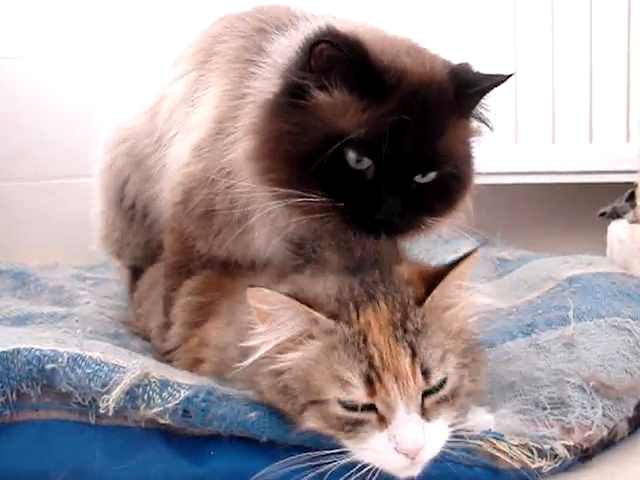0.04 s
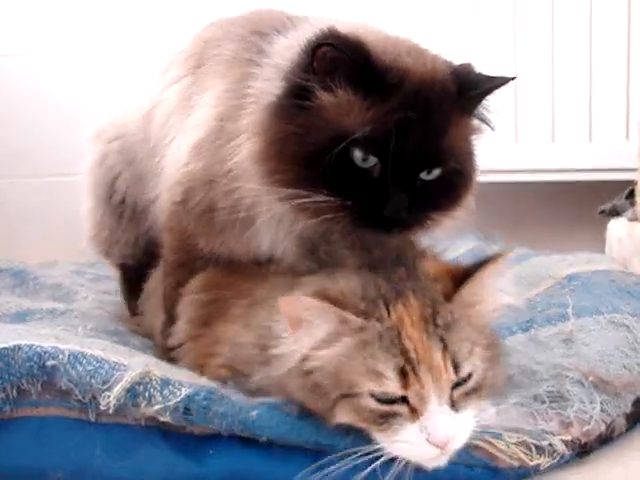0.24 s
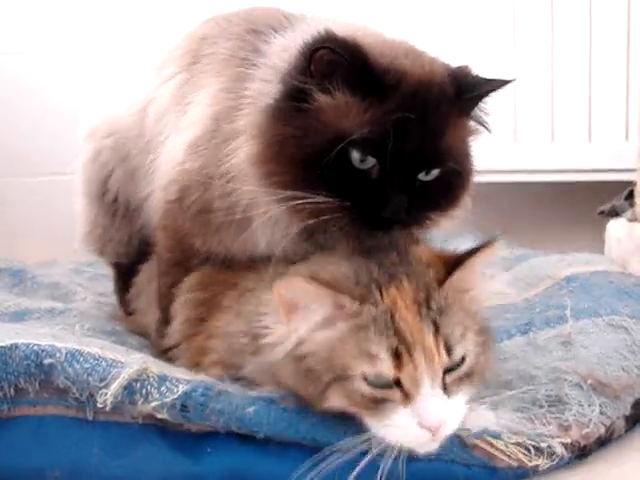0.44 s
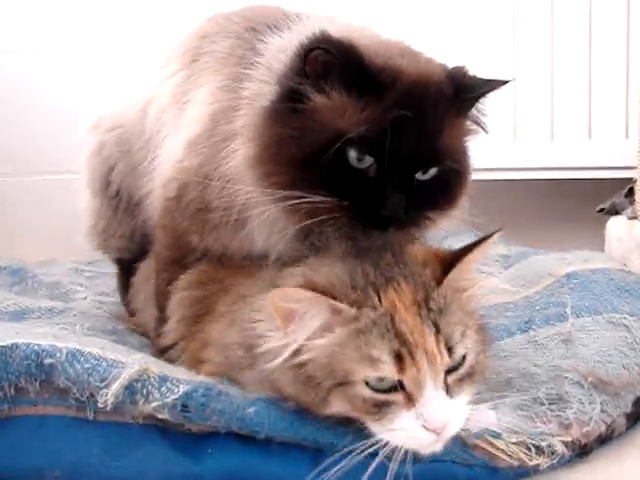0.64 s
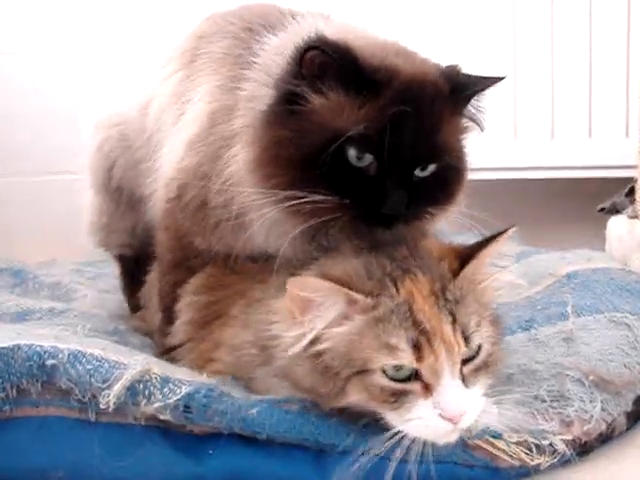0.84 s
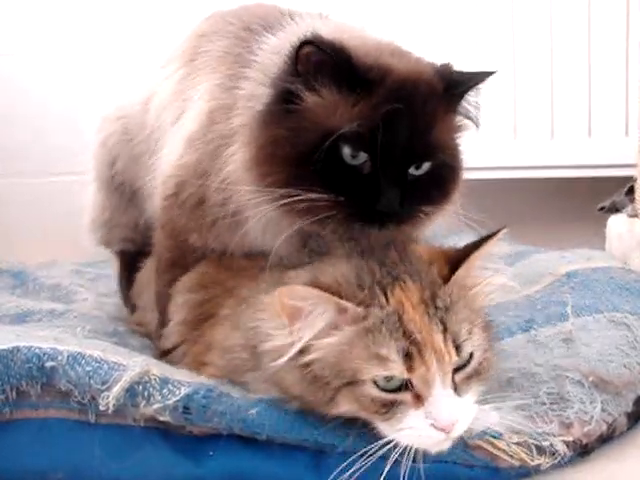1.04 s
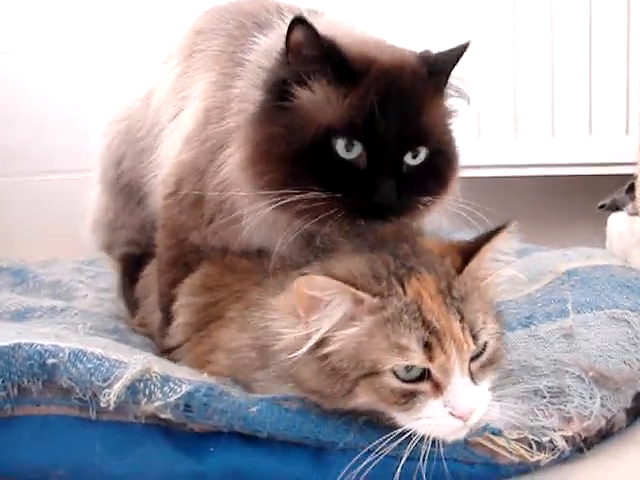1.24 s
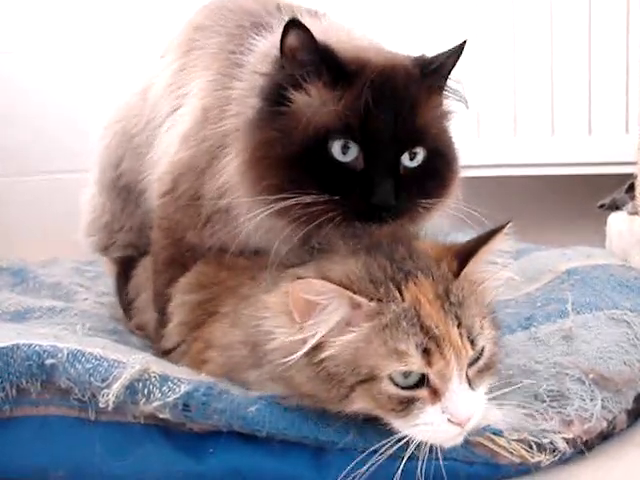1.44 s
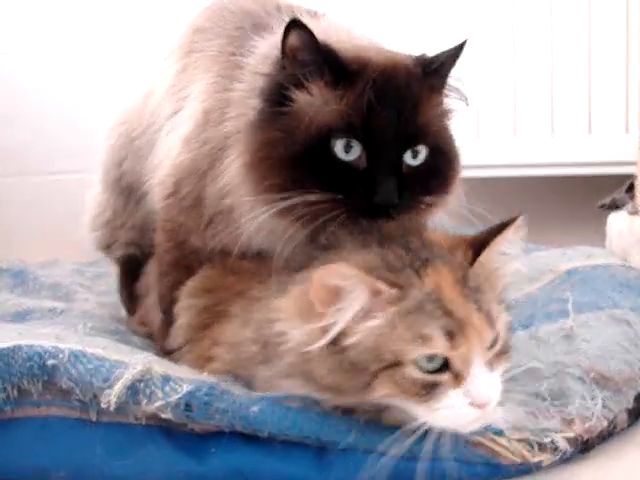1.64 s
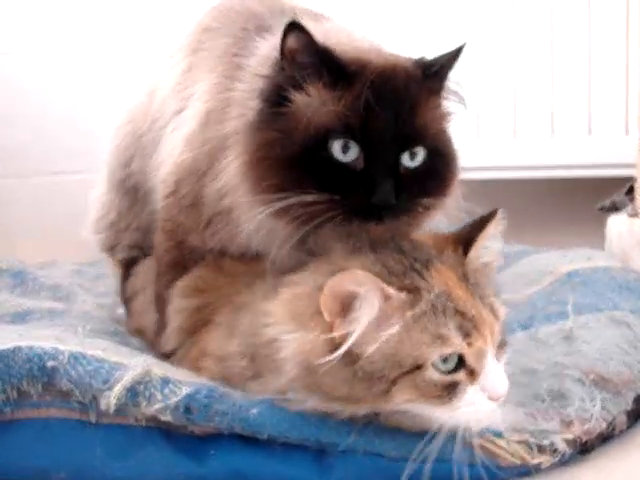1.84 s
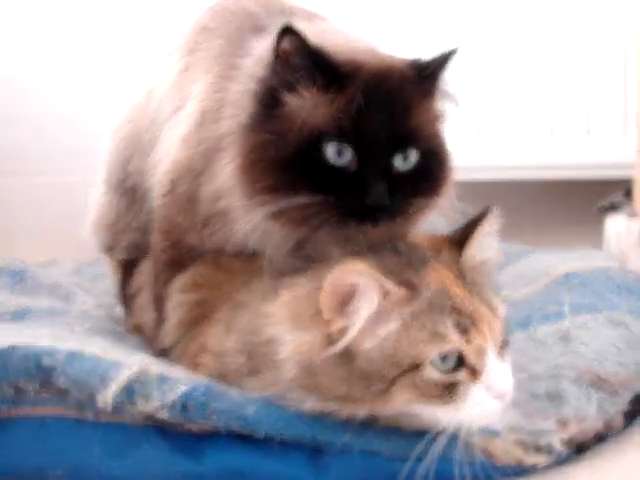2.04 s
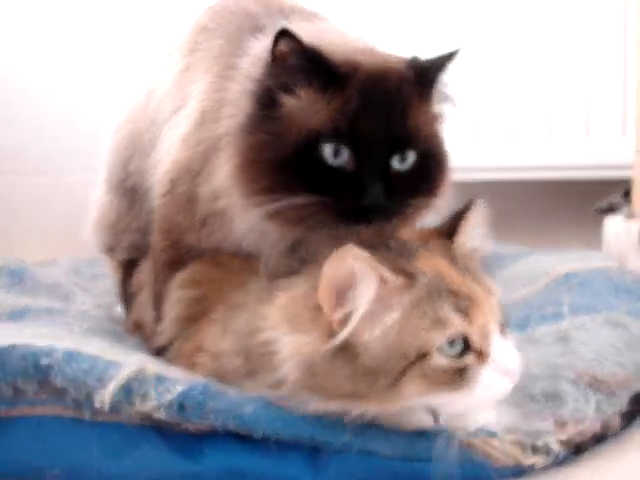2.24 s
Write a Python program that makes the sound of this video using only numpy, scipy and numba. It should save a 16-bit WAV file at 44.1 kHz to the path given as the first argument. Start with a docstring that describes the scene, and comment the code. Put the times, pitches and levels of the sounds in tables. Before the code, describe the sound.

A cat grunts three times, then gives one rough yowl that sinks into a low growl.

```python
"""A small hard room: a cat pinned under another gives three short grunts, then one long rough yowl.
The yowl rises with three hard pushes, sinks into a low growl as the mouth closes, and fades.
Uneven, fluttering vocal-fold pulses and puffs of turbulence ring mouth, chest and throat, along with
clear low harmonics. Two soft bumps and a faint rustle of bedding lie over a quiet background."""
import sys
import numpy as np
from scipy import signal
from scipy.fft import rfft, irfft
from scipy.io import wavfile
from scipy.ndimage import uniform_filter1d
from numba import njit

SR = 44100
rng = np.random.default_rng(int(sys.argv[2]) if len(sys.argv) > 2 else 0)


def persist_wave(psi):
    """Save psi, clipped to +-1, as 16-bit WAV."""
    counts = np.round(np.clip(psi, -1, 1) * 32767).astype(np.int16)
    wavfile.write(sys.argv[1], SR, np.atleast_2d(counts).T)


N = 101429
T = np.arange(N) / SR

# Each row: frequency in Hz, relative density in dB.
BACKGROUND_SPECTRUM = [(25, -14.5), (100, -6.5), (190, -4), (290, -0.5), (400, -8.5), (550, -10.5),
                       (800, -9), (1200, -16.5), (2500, -21.5), (6000, -24.5), (10000, -31)]
# Each row: start in seconds, time to release in seconds, level in dB, growl over tone in dB.
OPENING_GRUNTS = [(0.149, 0.021, -17, 2), (0.235, .037, -15, -1.5), (0.316, 0.032, -15.5, 0.5)]
# Each row: time in seconds, vocal-fold pitch in Hz.
FOLD_PITCH = [(.15, 275.4), (.26, 259.9), (.41, 254.7), (.56, 279.8), (.62, 264), (.69, 289.9),
              (.735, 318.9), (.82, 336.4), (.96, 323.9), (1.1, 298.1), (1.2, 313.1), (1.29, 265.9),
              (1.41, 243.9), (1.53, 220), (1.6, 173.9), (1.73, 166), (1.83, 146.6), (1.88, 184.6)]
# Each row: time in seconds, then mix levels in dB of harmonics 1, 2 and 3, flutter side tone,
# mouth growl, chest growl.
VOICE_MIX = [(.16, -11.5, -13.5, -14, -16, -1.5, -5.5), (.26, -5.5, -3, -12.5, -25, -4.5, -15),
             (.34, -7, -1, -24, -35.5, -8.5, -13.5), (.45, -8.5, -6, -22, -31, -10, -19.5),
             (.58, -10.5, -3.5, -30, -28, -3.5, -13), (.69, -9, -4.5, -11, -20.5, -4.5, -7),
             (.81, -14, -12, -20.5, -2.5, -0.5, -5.5), (.97, -4.5, -4.5, -13.5, -3, -7, -4),
             (1.06, -13.5, -19, -21.5, -4, -6, -2), (1.2, -10.5, -31, -21, -5.5, -5.5, -4),
             (1.3, -2.5, -3, -32, -25, -7.5, -8.5), (1.41, -3.5, -15.5, -38, -35, -7, -14),
             (1.5, -7.5, -26, -30.5, -31, -7, -4.5), (1.65, -1, -20, -24, -12, -9, -2.5),
             (1.82, -7.5, -10, -16, -10, -14, -6), (1.89, -2, -4, -25, -11, -10.5, -2.5)]
# Each row: time in seconds, lower resonance in Hz, upper resonance in Hz, upper over lower in dB.
MOUTH_FORMANTS = [(.16, 910, 1570, -6.5), (.27, 807, 1640, -10), (.42, 807, 1970, -13.5),
                  (.58, 716, 1920, -16), (.73, 628, 1600, -17.5), (.82, 588, 1580, -13.5),
                  (.92, 590, 1360, -8.5), (1.05, 540.1, 1345, -11.5), (1.25, 493, 1340, -12),
                  (1.42, 460, 1370, -23), (1.65, 377, 1590, -23), (1.9, 356, 1653, -7.5)]
# Each row: time in seconds, resonance in Hz.
CHEST_FORMANT = [(.95, 371.4), (1.65, 286)]
# Throat rasp. Each row: frequency in Hz, relative density in dB.
RASP_SPECTRUM = [(1500, -11), (2300, -33.5), (2550, 2), (2750, -7.5), (3050, -2.5), (3350, -4), (3650, -2),
                 (3880, -2), (4150, -6.5), (4500, -12.5), (5400, -13), (6200, -8.5), (6800, -12),
                 (8300, -14.5), (10000, -30)]
# Each row: time in seconds, mix level in dB.
RASP_MIX = [(.17, -18.5), (.27, -28), (.36, -30.5), (.45, -32), (.6, -25), (.75, -24.5), (.9, -22),
            (1.1, -26), (1.33, -32.5), (1.44, -32), (1.9, -35.5)]
# Narrow resonances of the room's corners. Each row: pitch in Hz, peak time in seconds, sigma in seconds, mix
# level in dB.
ROOM_RINGS = [(955, .17, 0.012, 2.5), (904, 0.418, 0.053, -7.5), (945, .74, 0.21, -10),
              (521, 1.195, .025, -4.5), (664, 1.26, 0.092, -7.5), (408, 1.289, 0.052, -3),
              (408, 1.518, 0.068, 0.5)]
# Each row: peak time in seconds, sigma in seconds, level in dB.
BEDDING_RUSTLES = [(0.222, 0.028, -38), (0.42, 0.13, -41), (1.617, 0.16, -50), (1.89, 0.009, -51.5),
                   (1.94, 0.039, -49.5), (2.201, 0.15, -49)]
# Each row: frequency in Hz, relative density in dB.
RUSTLE_SPECTRUM = [(200, -6), (800, 5.5), (1900, -1), (3000, -3), (6500, -10.5), (10000, -18.5)]
# Each row: time in seconds, level before the room in dB.
YOWL_EFFORT = [(.393, -53), (.41, -21), (.44, -18.5), (.7, -18.5), (.73, -10), (.76, -16), (.86, -14.5),
               (.885, -10), (.91, -13.5), (1.12, -16.5), (1.32, -13), (1.38, -18.5), (1.53, -20.5),
               (1.68, -28), (1.81, -32.5), (1.9, -28), (1.925, -38), (2.03, -51.5)]
# Each row: peak time in seconds, tone sigma in seconds, tone and snarl mix levels in dB.
HARD_PUSHES = [(.733, 0.012, 5, -19.5), (0.883, 0.014, 7, -18.5), (1.071, 0.052, -3.5, -25.5)]
# Each row: centre in Hz, width in Hz, relative level in dB.
SNARL_FORMANTS = [(2800, 620, -4.5), (3840, 450, -4.5)]
# Each row: peak time in seconds, sigma in seconds, pitch in Hz, level in dB.
SOFT_BUMPS = [(0.747, 0.00076, 62, -21.5), (1.613, 0.054, 68.84, -43.5)]


def undb(db):
    """Decibels to gain."""
    return 10 ** (np.asarray(db) / 20)


def curve(rows, column=1):
    """One table column, linear in time between rows."""
    rows = np.array(rows, float)
    return np.interp(T, rows[:, 0], rows[:, column])


def swell(peak_s, sigma_s):
    """Gaussian envelope."""
    return np.exp(-.5 * ((T - peak_s) / sigma_s) ** 2)


def sine(cycles):
    """Tone at rms 1."""
    return np.sqrt(2) * np.sin(2 * np.pi * cycles)


def steady(x, window_samples=3000):
    """Hold the running rms at 1."""
    return x / np.sqrt(uniform_filter1d(x * x, window_samples) + 1e-12)


def walk(cutoff_hz):
    """Smooth random drift, spread 1."""
    hz = np.fft.rfftfreq(N, 1 / SR)
    drift = irfft(rfft(rng.standard_normal(N)) / (1 + (hz / cutoff_hz) ** 4), N)
    return drift / np.std(drift)


def colour(x, spectrum):
    """Filter by a spectrum, scale to rms 1."""
    hz, db = np.array(spectrum, float).T
    bins_hz = np.fft.rfftfreq(N, 1 / SR)
    shaped = irfft(rfft(x) * undb(np.interp(np.log(bins_hz + 1), np.log(hz), db)), N)
    return shaped / np.std(shaped)


@njit
def bandpass(x, hz, width_hz):
    """State-variable band-pass, gain 1 at the centre."""
    y, band, low = np.empty(len(x)), 0., 0.
    for i in range(len(x)):
        g, damping = np.tan(np.pi * hz[i] / SR), width_hz[i] / hz[i]
        v = (band + g * (x[i] - low)) / (1 + g * (g + damping))
        band, low = 2 * v - band, low + 2 * g * v
        y[i] = damping * v
    return y


def formant(x, hz, width_hz, stages=4):
    """Movable resonance: cascaded band-passes, each width_hz wide, held at rms 1."""
    for _ in range(stages):
        x = bandpass(x, hz + np.zeros(N), width_hz + np.zeros(N))
    return steady(x, window_samples=1300)


def background(level_db=-47.5):
    """Quiet, steady low noise."""
    return undb(level_db) * colour(rng.standard_normal(N), BACKGROUND_SPECTRUM)


def grunts(attack_s=0.015, release_s=0.014):
    """Short bursts of effort: envelopes for tone and growl."""
    tone = growl = 0
    for start_s, length_s, db, hoarse_db in OPENING_GRUNTS:
        attack = np.clip((T - start_s) / attack_s, 0, 1)
        release = np.exp(-np.maximum(T - start_s - length_s, 0) / release_s)
        tone += undb(db - hoarse_db / 2) * attack * release
        growl += undb(db + hoarse_db / 2) * attack * release
    return tone, growl


def vocal_folds(cycles, flutter_cycles, shimmer_db=1, puff_decay_cycles=0.44):
    """One uneven pulse and one turbulent puff per cycle, both throbbing with a slower flutter."""
    phase = cycles + .06 * (walk(150) + 2 * walk(35))  # jitter
    count = np.maximum.accumulate(np.floor(phase))
    pulses = np.diff(count, prepend=count[0]) * undb(-shimmer_db * walk(290))
    puffs = rng.standard_normal(N) * np.exp(-(phase % 1) / puff_decay_cycles)
    flutter = np.exp(0.23 * np.sin(2 * np.pi * flutter_cycles))
    return steady(pulses) * flutter, steady(puffs) * flutter


def mouth_growl(pulses, puffs, puff_db=-4):
    """The folds drive two mouth resonances; the lower sinks and narrows as the mouth closes."""
    source = pulses + undb(puff_db) * puffs
    lower_hz = curve(MOUTH_FORMANTS)
    lower = formant(source, lower_hz, width_hz=np.minimum(670, 0.95 * lower_hz))
    upper = formant(source, curve(MOUTH_FORMANTS, 2), width_hz=684)
    return (lower + undb(curve(MOUTH_FORMANTS, 3)) * upper) * undb(curve(VOICE_MIX, 5))


def chest_growl(puffs):
    """Puffs drive one low, broad resonance."""
    return formant(puffs, curve(CHEST_FORMANT), width_hz=454) * undb(curve(VOICE_MIX, 6))


def throat_rasp(pulses, puffs):
    """Pulsed turbulence hisses high in the throat."""
    source = puffs + 0.24 * pulses + 0.15 * rng.standard_normal(N)
    return colour(source, RASP_SPECTRUM) * undb(curve(RASP_MIX))


def harmonics(cycles, flutter_cycles, wobble_db=3.5, wobble_hz=46):
    """Three fold harmonics and a flutter side tone, each wavering in level."""
    partials = [cycles, 2 * cycles, 3 * cycles, cycles + flutter_cycles]
    return sum(undb(curve(VOICE_MIX, column) + wobble_db * walk(wobble_hz)) * sine(phase)
               for column, phase in enumerate(partials, 1))


def room(x, wet_db, t60_s=0.32, gap_s=0.0021):
    """Direct sound plus a short, evenly coloured tail from near walls."""
    tail = rng.standard_normal(N) * np.exp(-np.log(1000) * T / t60_s) * (T > gap_s)
    for _ in range(3):
        whitened = irfft(np.exp(1j * np.angle(rfft(tail))), N)
        tail = whitened * (T > gap_s) * np.exp(-T / t60_s)
    return x + undb(wet_db) * signal.fftconvolve(x, tail / np.linalg.norm(tail))[:N]


def ring(hz, wander_hz=3.93):
    """A narrow resonance sings on one slightly wavering pitch."""
    return sine(np.cumsum(hz + wander_hz * walk(24.6)) / SR)


def rustles():
    """Bedding rustles as the cats shift."""
    envelope = sum(undb(db) * swell(peak_s, sigma_s) for peak_s, sigma_s, db in BEDDING_RUSTLES)
    return envelope * colour(rng.standard_normal(N), RUSTLE_SPECTRUM)


def pushes(puffs, tone_hz=376.8, linger_db=-33):
    """Each hard push swells a firm tone and a snarl; some snarl lingers as the yowl sinks."""
    snarl = sum(undb(db) * formant(puffs, hz, width_hz, stages=2) for hz, width_hz, db in SNARL_FORMANTS)
    tone_gain = 0
    snarl_gain = undb(linger_db) * np.clip(T - HARD_PUSHES[0][0], 0, 1)
    for peak_s, sigma_s, tone_db, snarl_db in HARD_PUSHES:
        tone_gain += undb(tone_db) * swell(peak_s, sigma_s)
        snarl_gain += undb(snarl_db) * swell(peak_s, 1.46 * sigma_s)
    return tone_gain * ring(tone_hz), snarl_gain * snarl


def bumps():
    """Soft, low bumps as the cats shift."""
    total = 0
    for peak_s, sigma_s, hz, db in SOFT_BUMPS:
        phase_rad = 2 * np.pi * hz * (T - peak_s) + .5 * walk(6.7)
        total += undb(db) * swell(peak_s, sigma_s) * np.sqrt(2) * np.cos(phase_rad)
    return total


def cat(flutter_hz=77):
    """Grunts, then the yowl: the folds feed a clear tone and a rough growl into the room."""
    cycles = np.cumsum(curve(FOLD_PITCH) * (1 + .008 * walk(30))) / SR
    flutter_cycles = np.cumsum(flutter_hz * (1 + 0.0806 * walk(26))) / SR
    pulses, puffs = vocal_folds(cycles, flutter_cycles)
    push_tone, snarl = pushes(puffs)
    growl = mouth_growl(pulses, puffs) + chest_growl(puffs) + throat_rasp(pulses, puffs) + snarl
    tone = harmonics(cycles, flutter_cycles) + push_tone
    for hz, peak_s, sigma_s, db in ROOM_RINGS:
        tone += undb(db) * swell(peak_s, sigma_s) * ring(hz)
    grunt_tone_gain, grunt_growl_gain = grunts()
    yowl_gain = undb(curve(YOWL_EFFORT)) * (T > YOWL_EFFORT[0][0])
    mix_rms = np.sqrt(uniform_filter1d((tone + growl) ** 2, size=1300))
    tone *= (grunt_tone_gain + yowl_gain) / mix_rms  # effort alone sets the loudness
    growl *= (grunt_growl_gain + yowl_gain) / mix_rms
    return room(tone, wet_db=-12.5) + room(growl, wet_db=-0.5)


def scene():
    """Cat and bedding over the background, mono."""
    return (cat() + bumps() + rustles() + background())[None]


def record(dry, ceiling=.85, cutoff_hz=9900):
    """Soft peak limit, then a steep low-pass."""
    rounded = dry / (1 + (dry / ceiling) ** 8) ** (1 / 8)
    return signal.sosfilt(signal.ellip(10, .2, 80, cutoff_hz, fs=SR, output="sos"), rounded)


dry = scene()
out = record(dry)
persist_wave(out)
```